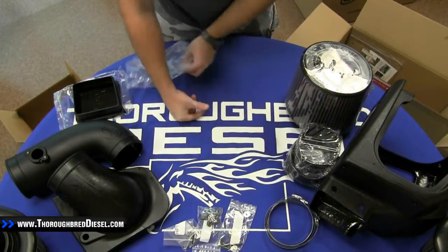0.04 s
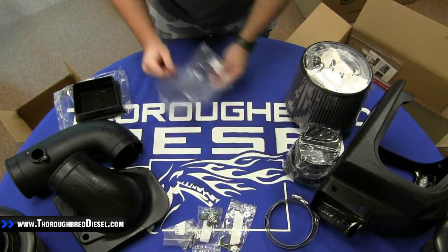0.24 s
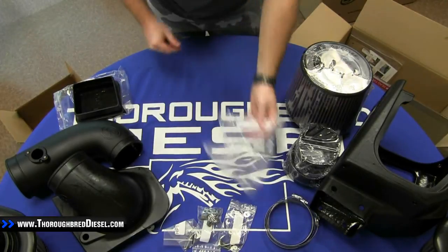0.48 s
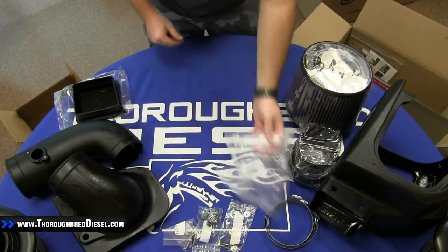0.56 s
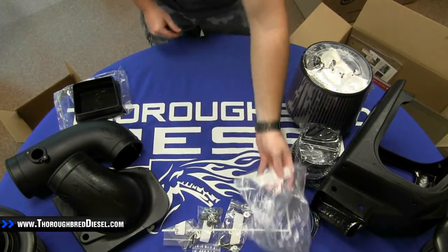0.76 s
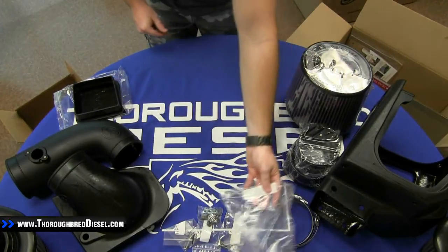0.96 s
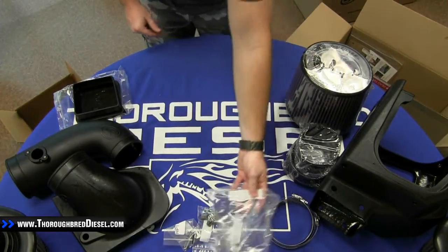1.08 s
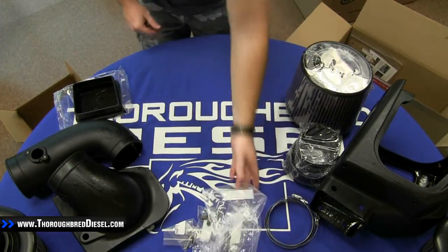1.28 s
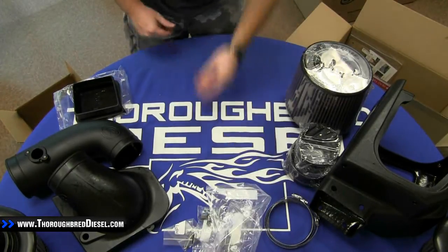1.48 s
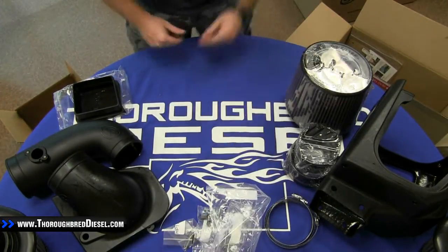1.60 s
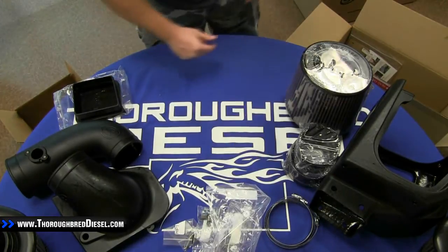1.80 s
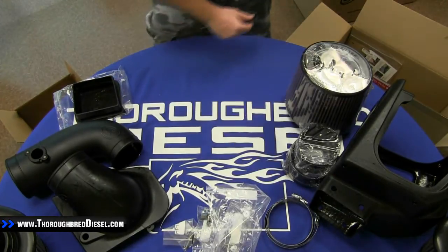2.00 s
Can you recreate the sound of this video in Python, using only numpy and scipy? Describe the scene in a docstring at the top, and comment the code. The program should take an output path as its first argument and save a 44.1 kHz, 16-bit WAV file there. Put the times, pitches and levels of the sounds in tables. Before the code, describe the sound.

Small plastic bag crinkles briefly and is set down, with dull bumps on a table.

```python
"""A small plastic bag of hardware crinkles as it is picked off a cloth-covered table and laid down again.
Its film buckles in snaps over a fine crackle; a stiff crease pops as the bag swings, and it lands with
a soft thud and a puff of air. A hand bumps the table and rings its modes. The moving arm rumbles and
brushes back over the cloth, and a few light taps follow, in a quiet room."""
import sys
import numpy as np
from scipy import signal
from scipy.fft import rfft, irfft, next_fast_len
from scipy.io import wavfile

SR = 44100
rng = np.random.default_rng(int(sys.argv[2]) if len(sys.argv) > 2 else 0)


def unload_wav(signal):
    """Save mono or channel-first audio to the path in sys.argv[1] as 16-bit WAV at rate SR, clipped to [-1, 1]."""
    wavfile.write(
        sys.argv[1],
        SR,
        np.round(np.clip(np.atleast_2d(signal).T, -1, 1) * 32767).astype(np.int16),
    )


N = 90404
T = np.arange(N) / SR


def film_snaps():
    """Single buckles of the film, some brighter than others."""
    # buckles: (time [s], level [dB], treble edge [Hz], decay [s])
    snaps = [(0.0145, -41, 6100, 0.0013), (0.017, -35, 6000, 0.0064), (0.0303, -27, 7250, 0.0029),
             (0.036, -33.5, 8000, 0.0014), (0.0461, -33, 8200, 0.001), (0.053, -22.5, 10500, 0.0038),
             (0.0585, -36, 8840, 0.004), (0.0685, -33.5, 8000, .002), (0.0899, -26.5, 6950, 0.001),
             (0.0923, -27, 11000, 0.0036), (0.1182, -29, 11000, 0.0026), (0.1205, -27.5, 1400, 0.003),
             (0.1495, -35, 3500, 0.0022), (0.1795, -40, 3000, 0.0012), (0.267, -38.5, 10200, .003),
             (0.3254, -29, 13100, 0.003), (0.3341, -27.5, 7200, 0.0014), (0.3366, -35, 11000, 0.0027),
             (1.2222, -38, 7050, 0.012), (1.233, -38.5, 6500, 0.00049), (1.2389, -30.5, 10100, 0.00095),
             (1.248, -29, 7500, 0.0011), (1.2519, -35.5, 5470, 0.0011), (1.2621, -38, 3500, 0.0022),
             (1.3267, -41.5, 4960, 0.0011), (1.349, -49.5, 5030, 0.0014)]
    # film spectrum: (frequency [Hz], level [dB])
    spectrum = [(150, 5.5), (400, 1.5), (800, 2), (1400, 2), (2500, -3), (4500, 1.5), (7000, -4.5),
                (10500, -8.5), (13000, -22.5), (16000, -7.5)]
    out = np.zeros(N)
    for s, db, edge_hz, decay_s in snaps:
        lowpass = signal.butter(2, edge_hz, fs=SR, output="sos")
        add(out, s, from_db(db) * signal.sosfilt(lowpass, crack(decay_s, flutter=0.47)))
    return colour(out, spectrum)


def film_crackle():
    """Countless tiny creases give way while the bag is worked; the harder, the brighter."""
    # handling effort: (time [s], level [dB])
    handling = [(0, -56), (0.03, -56.5), (0.06, -44.5), (0.08, -47), (0.11, -45.5), (0.14, -50),
                (0.17, -54), (0.22, -57), (0.3, -50.5), (0.35, -54), (0.42, -72), (0.56, -64.5),
                (0.8, -77.5), (0.92, -63.5), (1.02, -92), (1.21, -72), (1.23, -56), (1.25, -43),
                (1.29, -85), (1.33, -62.5), (1.46, -68.5), (1.55, -94)]
    # crackle spectrum: (frequency [Hz], level [dB])
    spectrum = [(100, -5.5), (400, 4.5), (800, -0.5), (1400, 1.5), (2500, 1), (5000, 3), (7000, -3),
                (10500, -7), (13000, -23), (16000, -40)]
    rate_per_s, spread_db, gentle_edge_hz = 5000, 3.5, 5500
    sizes = from_db(spread_db * np.minimum(rng.exponential(1, N), 4))
    signs = rng.choice([-1, 1], N)
    grains = unit_rms(sizes * signs * (rng.random(N) < rate_per_s / SR))
    dull = signal.sosfilt(signal.butter(1, gentle_edge_hz, fs=SR, output="sos"), grains)
    effort = envelope(handling)
    brightness = (effort / effort.max()) ** 0.34
    return colour(effort * (brightness * grains + (1 - brightness) * dull), spectrum)


def crease_pops():
    """A taut crease flips over: a few cycles that swell and die in about a millisecond."""
    # crease flips: (time [s], level [dB], pitch [Hz])
    pops = [(0.2382, -29.5, 5220), (0.254, -33.5, 4800), (0.2685, -39, 4300), (0.2988, -32, 5500),
            (0.303, -33, 5760), (0.3241, -12, 4950), (0.3342, -28, 5200), (0.3362, -24, 5200),
            (1.2403, -36, 5700), (1.2477, -26.5, 3060), (1.2501, -25, 4740)]
    width_hz = 1730
    out, t = np.zeros(N), T[:SR // 20]
    swell = (t * np.exp(-np.pi * width_hz * t / 2)) ** 2
    for s, db, hz in pops:
        add(out, s, from_db(db) * swell / swell.max() * np.sin(2 * np.pi * hz * t))
    return out


def air_puffs():
    """The bag shoves air aside: heavily damped swings of pressure."""
    # puffs: (time [s], level [dB], frequency [Hz], t60 [s])
    puffs = [(0.324, -20.5, 91, .022), (0.334, -39.5, 28, 0.21), (1.24, -40, 19, 0.32),
             (1.247, -47, 79, .025), (1.704, -49, 35, 0.17)]
    out = np.zeros(N)
    for s, db, hz, t60_s in puffs:
        add(out, s, from_db(db) * np.sin(2 * np.pi * hz * T) * np.exp(-np.log(1000) * T / t60_s))
    return out


def table_bumps():
    """A hand bumps the table, later the bag lands with a soft thud; the top radiates little deep bass."""
    # blows on the table: (time [s], level [dB], contact [s])
    bumps = [(0.006, -23, 0.011), (0.0332, -26, 0.0022), (0.0505, -37, 0.00089), (0.058, -23.5, 0.0093),
             (0.1192, -39, 0.00098), (0.1221, -10.5, 0.0042), (0.1309, 2, 0.0084), (0.1434, -2.2, 0.00395),
             (0.168, -5, 0.00464), (0.2416, -12.5, 0.012), (1.1345, -50.5, 0.0027), (1.2425, -49, .002),
             (1.252, -42, 0.0012), (1.32, -51, 0.0016)]
    # table modes: (frequency [Hz], level [dB], t60 [s])
    modes = [(106.95, 2, 0.21), (124.2, -7.5, 0.17), (189, -27.5, 0.6), (223, -13, 0.27), (280, -22, 0.16),
             (356.8, -8, 0.23)]
    radiation = signal.butter(2, 150, "high", fs=SR, output="sos")
    return signal.sosfilt(radiation, struck(bumps, modes))


def light_taps():
    """A dry tick and some dull little knocks."""
    # dry tick: (time [s], level [dB])
    ticks = [(1.6964, -35)]
    # tick spectrum: (frequency [Hz], level [dB])
    spectrum = [(150, -6), (700, 0), (1200, -1), (1900, 7.5), (3800, 4.5), (6000, -2), (9000, -30),
                (15000, -35)]
    # soft taps: (time [s], level [dB])
    taps = [(0.1195, -28), (0.1225, -22.5), (1.1345, -51), (1.2425, -49.5), (1.2554, -43.5),
            (1.2643, -44.5), (2.016, -41.5), (2.029, -43.5), (2.034, -45), (2.0392, -42.5)]
    # tap modes: (frequency [Hz], level [dB], t60 [s])
    modes = [(173, -11, 0.017), (394.6, -5, 0.024), (486, -9.5, 0.036), (676, -10, 0.026),
             (985, -13, 0.024), (1940, -13, 0.053)]
    contact_s = 0.0007
    clicks = np.zeros(N)
    for s, db in ticks:
        add(clicks, s, from_db(db) * crack(decay_s=0.0025, flutter=0.21))
    knocks = struck([(s, db, contact_s) for s, db in taps], modes)
    return colour(clicks, spectrum) + knocks


def cloth_brush():
    """Friction noise as the arm brushes back over the cloth."""
    # stroke: (time [s], level [dB])
    stroke = [(1.48, -84), (1.56, -61), (1.62, -58), (1.66, -61.5), (1.69, -57), (1.74, -63.5), (1.8, -80)]
    # cloth spectrum: (frequency [Hz], level [dB])
    spectrum = [(200, 5.5), (700, -0.5), (1300, 4.5), (2200, 5), (4500, 5.5), (7000, -7.5), (12000, -18)]
    return envelope(stroke) * noise(spectrum)


def arm_rumble():
    """Dull rumble while the arm moves."""
    # movement: (time [s], level [dB])
    movement = [(0, -40.5), (0.09, -41.5), (0.2, -42), (0.36, -53), (0.48, -60.5), (0.56, -56), (0.68, -58),
                (0.82, -67.5), (0.93, -58.5), (1.04, -66), (1.21, -67), (1.25, -55), (1.33, -58),
                (1.42, -64), (1.66, -69), (1.73, -56), (1.83, -65), (2.05, -70)]
    # rumble spectrum: (frequency [Hz], level [dB])
    spectrum = [(20, -11), (60, -4.5), (140, 2), (220, -9), (330, -13), (550, -23.5), (1000, -26),
                (3000, -70)]
    return envelope(movement) * noise(spectrum)


def room_tail(x):
    """Diffuse, slightly dull tail that dies at its own rate in each band."""
    # room decay: (frequency [Hz], t60 [s])
    decay = [(100, 0.52), (1000, 0.33), (4800, 0.38), (7500, 0.43), (12000, 0.44)]
    delay_s, treble_edge_hz = 0.007, 9000
    t, tail = T[:SR // 2], 0
    edges_hz = np.geomspace(60, 16000, 16)
    for low, high in zip(edges_hz, edges_hz[1:]):
        bandpass = signal.butter(2, [low, high], "band", fs=SR, output="sos")
        band = signal.sosfilt(bandpass, rng.standard_normal(len(t)))
        tail = tail + band * np.exp(-np.log(1000) * t / at_hz(decay, np.sqrt(low * high)))
    tail = tail * (t > delay_s)
    lowpass = signal.butter(2, treble_edge_hz, fs=SR, output="sos")
    response = signal.sosfilt(lowpass, tail / np.sqrt(np.sum(tail ** 2)))
    return signal.fftconvolve(x, response)[:N]


def noise_floor():
    """Steady background (mid, side): low noise in the centre, hiss that differs between the ears."""
    # centre spectrum: (frequency [Hz], level [dB])
    centre = [(20, 5), (40, -1), (65, 9.5), (100, 1.5), (140, -0.5), (195, 5.5), (260, -28.5), (500, -14.5),
              (1000, -17), (2500, -19), (5000, -20.5), (10000, -23.5), (15500, -27.5)]
    # side hiss spectrum: (frequency [Hz], level [dB])
    hiss = [(25, 12), (60, 13), (125, 9), (500, 3.5), (2000, 0.5), (8000, -1.5), (15500, -6.5)]
    return from_db(-59.5) * noise(centre), from_db(-65.5) * noise(hiss)


def crack(decay_s, flutter):
    """A click with a dying flutter behind it; energy of 1 ms at unit rms."""
    t = T[:SR // 20]
    burst = flutter * rng.standard_normal(len(t)) * np.exp(-t / decay_s)
    burst[0] = 1
    return burst * np.sqrt(SR / 1000 / np.sum(burst ** 2))


def struck(blows, modes):
    """Half-sine contacts, centred on their times, set a body's modes ringing."""
    force = np.zeros(N)
    for s, db, contact_s in blows:
        push = np.sin(np.pi * np.minimum(T[:SR // 20] / contact_s, 1))
        add(force, s - contact_s / 2, from_db(db) * push / push.sum())
    return sum(from_db(db) * ring(force, hz, t60_s) for hz, db, t60_s in modes)


def ring(x, hz, t60_s):
    """One mode: a unit click starts a decaying sine of height 1."""
    radius, angle = from_db(-60 / (t60_s * SR)), 2 * np.pi * hz / SR
    return signal.lfilter([0, np.sin(angle)], [1, -2 * radius * np.cos(angle), radius ** 2], x + 1e-18)


def colour(x, spectrum):
    """Minimum-phase filter with the given spectrum and unit power gain."""
    size = 2 * next_fast_len(len(x))
    bins_hz = np.arange(size // 2 + 1) * SR / size
    gain = unit_rms(from_db(at_hz(spectrum, bins_hz)))
    cepstrum = irfft(np.log(gain))
    cepstrum[1:size // 2] *= 2  # fold onto positive time
    cepstrum[size // 2 + 1:] = 0
    return irfft(rfft(x, size) * np.exp(rfft(cepstrum)))[:len(x)]


def noise(spectrum):
    """Coloured noise, rms 1."""
    return unit_rms(colour(rng.standard_normal(N), spectrum))


def at_hz(points, hz):
    """Read a table on a log-frequency axis."""
    points_hz, values = np.transpose(points)
    return np.interp(np.log(np.maximum(hz, 1)), np.log(points_hz), values)


def envelope(points):
    """Gain over time from (time [s], level [dB]) points."""
    return from_db(np.interp(T, *np.transpose(points)))


def add(out, start_s, sound):
    """Mix a sound in at a time."""
    i = max(int(start_s * SR), 0)
    out[i:i + len(sound)] += sound[:N - i]


def from_db(db):
    """Decibels to gain."""
    return 10 ** (np.asarray(db) / 20)


def unit_rms(x):
    """Scale to rms 1."""
    return x / np.sqrt(np.mean(x ** 2) + 1e-20)


def scene():
    """All sources centred; only the room tail and the hiss differ between the ears."""
    near = film_snaps() + film_crackle() + light_taps() + cloth_brush()
    pops = crease_pops()
    send = from_db(-11.5) * near + from_db(-14.5) * pops
    centre = near + pops + air_puffs() + table_bumps() + room_tail(send) + arm_rumble()
    floor_mid, floor_side = noise_floor()
    mid = centre + floor_mid
    side = from_db(-31) * room_tail(send) + floor_side
    return np.array([mid + side, mid - side])


def record(dry):
    """Steep low-pass at 15.9 kHz."""
    return signal.sosfilt(signal.ellip(10, .1, 80, 15900, fs=SR, output="sos"), dry)


dry = scene()
out = record(dry)
unload_wav(out)
```